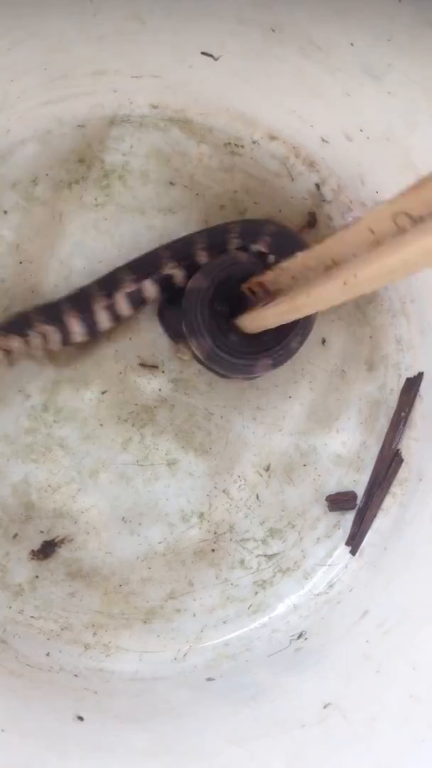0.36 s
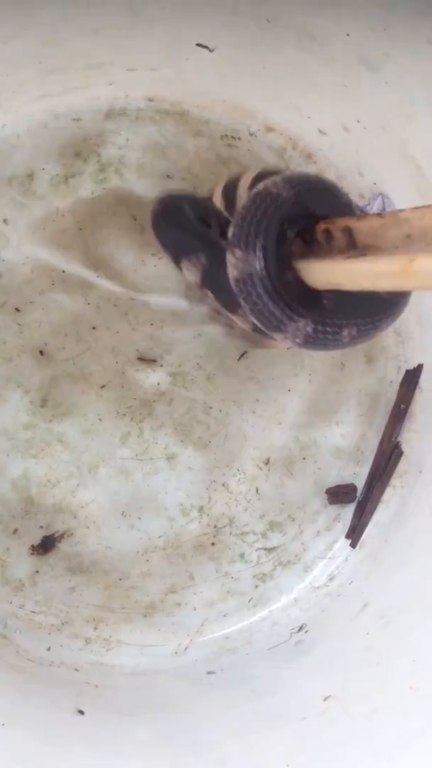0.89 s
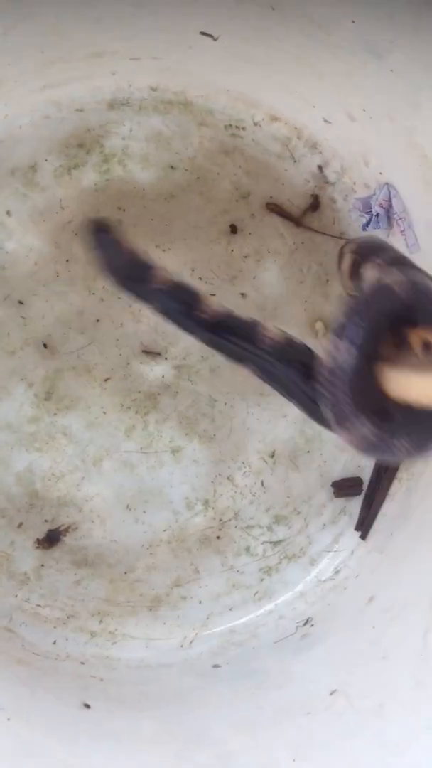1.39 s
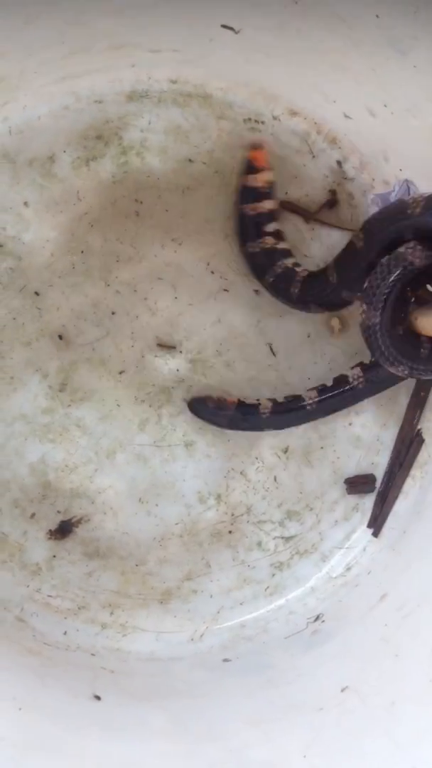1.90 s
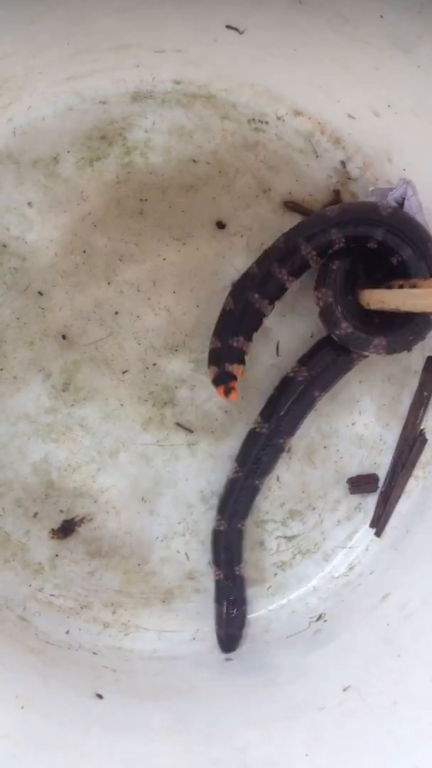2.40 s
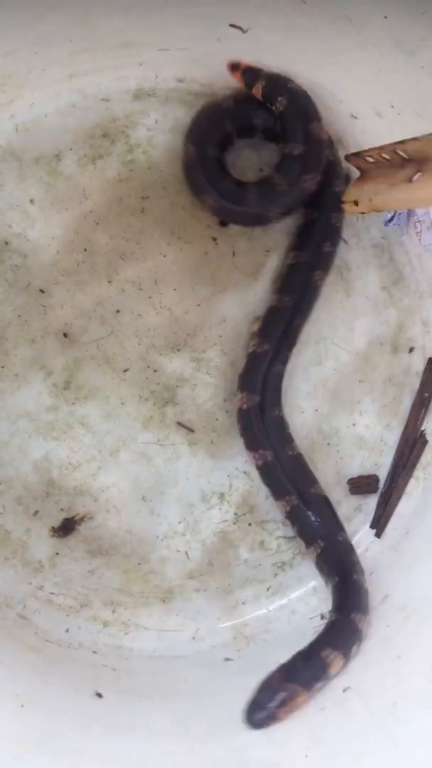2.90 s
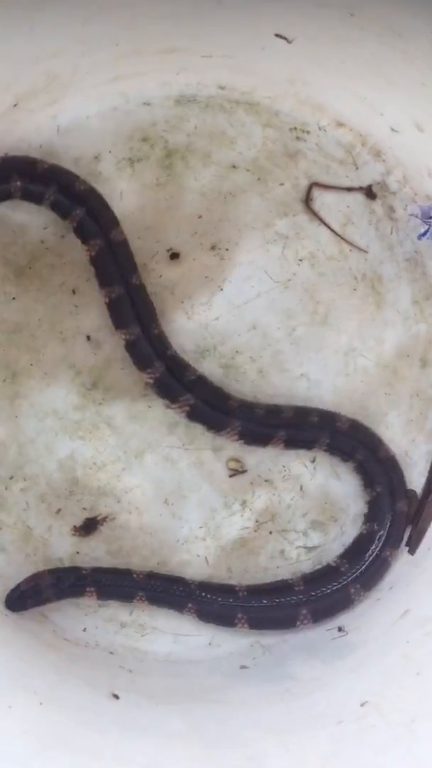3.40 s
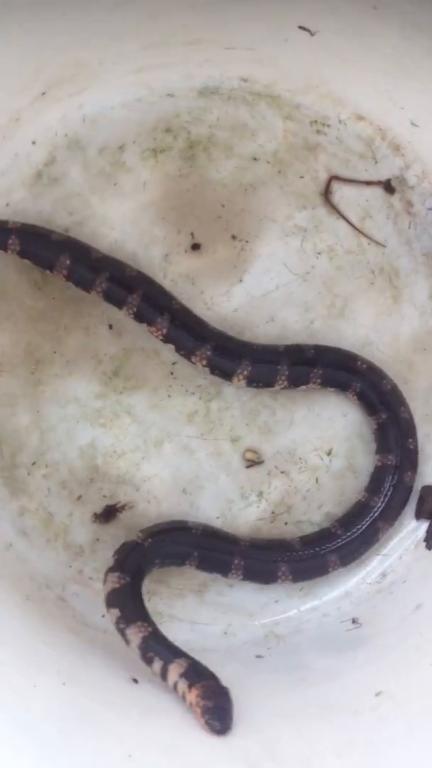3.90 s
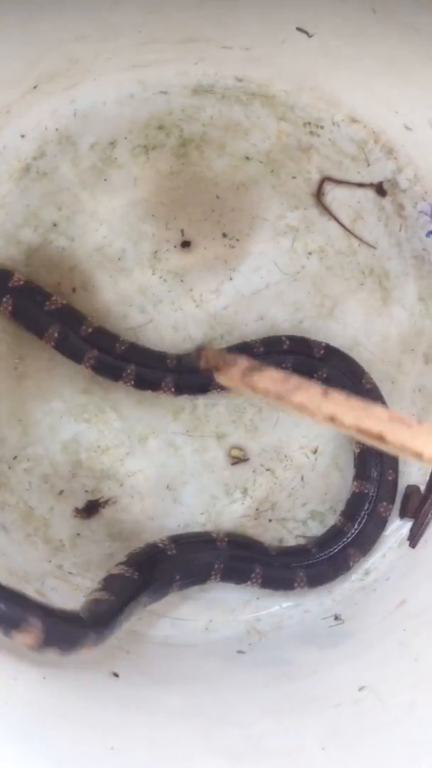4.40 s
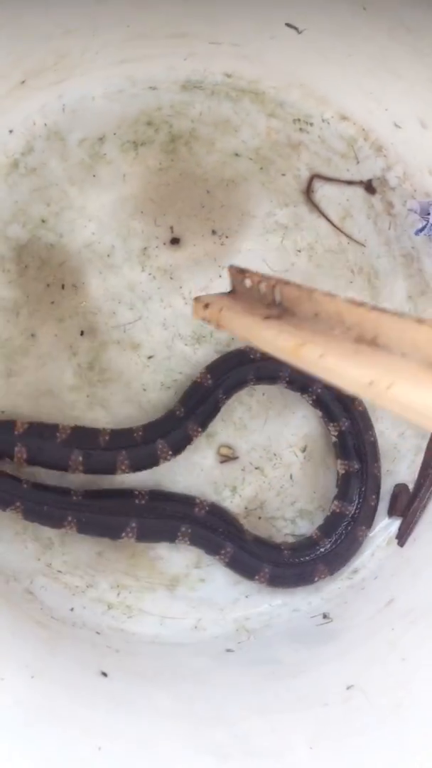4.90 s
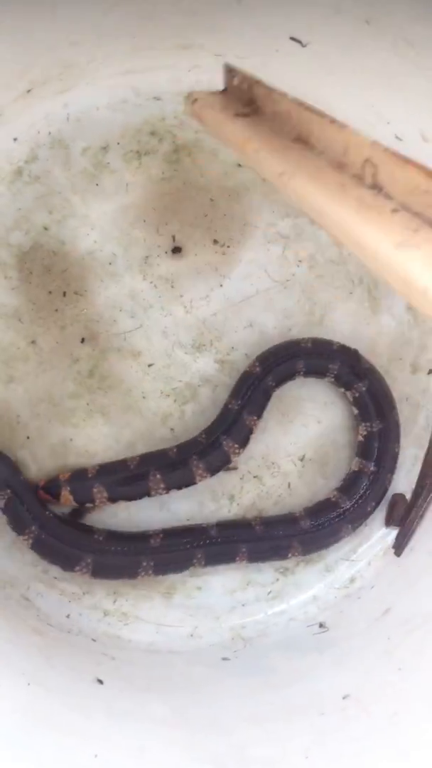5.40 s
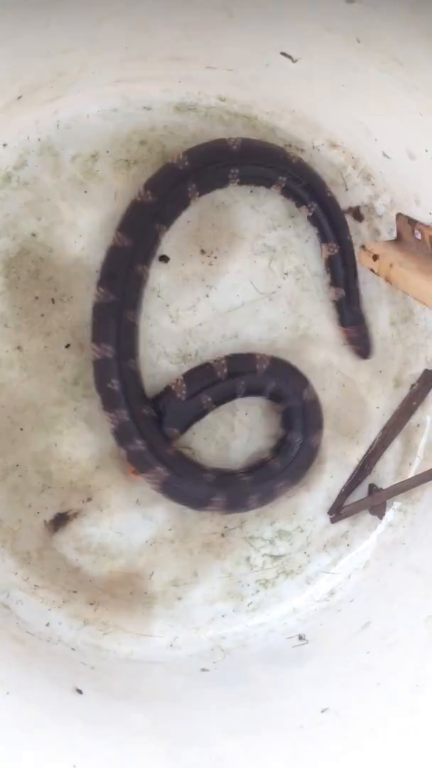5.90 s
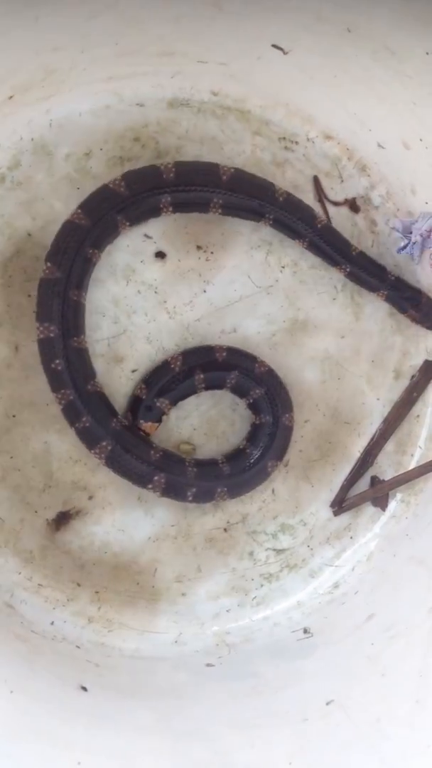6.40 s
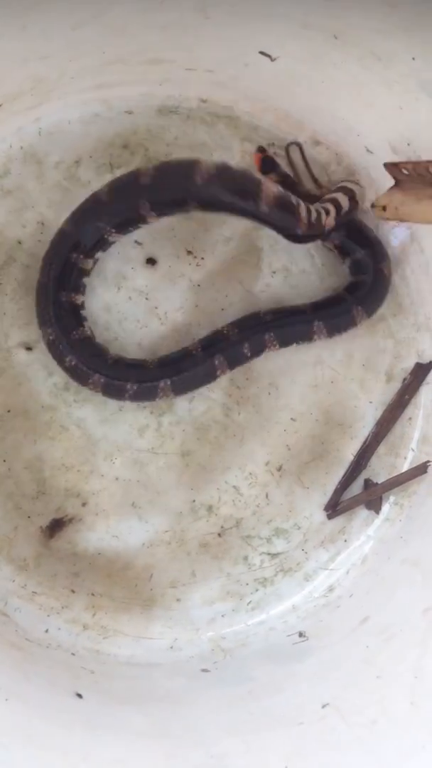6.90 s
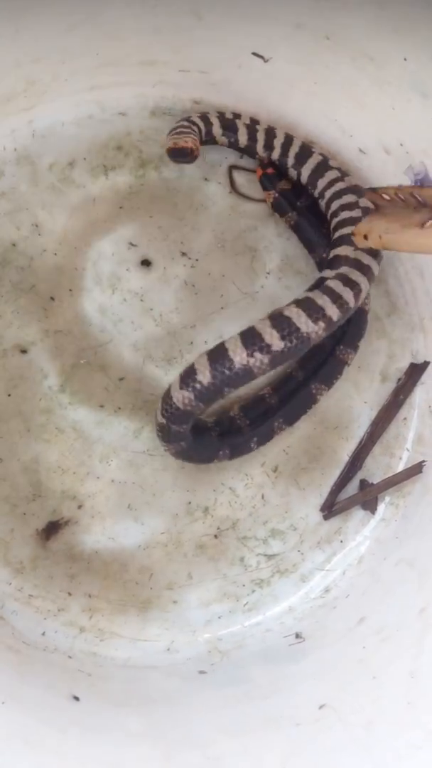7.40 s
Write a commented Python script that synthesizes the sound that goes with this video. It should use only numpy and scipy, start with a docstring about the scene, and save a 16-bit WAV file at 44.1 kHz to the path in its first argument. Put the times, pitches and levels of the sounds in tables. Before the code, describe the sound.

A bamboo stick knocks, taps and skids inside a plastic basin, its bottom thumping hollowly between quiet rumbling gaps with faint chirps.

```python
"""Outdoors, in a plastic basin, a split bamboo stick prods a small snake around the bottom.
The bottom booms like a slack drum: decaying sine modes swell at each landing of stick or body.
The stick tip ticks in filtered noise bursts and skids in dense clicks; scales rustle in uneven catches.
Walls and bamboo ring as resonators over noise-made rumble, murmur and hiss.
Thin far tones, narrow bands of noise, come and go."""
import sys
import numpy as np
from scipy import signal
from scipy.fft import rfft, irfft, next_fast_len
from scipy.io import wavfile

SR = 44100
rng = np.random.default_rng(int(sys.argv[2]) if len(sys.argv) > 2 else 0)


def wav_out(sig):
    """Save sig, one row per channel (or a flat mono array), as 16-bit PCM at SR to the path in sys.argv[1]."""
    wavfile.write(sys.argv[1], SR, np.round(np.clip(np.atleast_2d(sig).T, -1, 1) * 32767).astype(np.int16))


def nominal_scale(level):
    """Amplitude ratio for a level in decibels (scalar or array-like)."""
    x = np.asarray(level, float) / 20
    return 10 ** x


N = 332514

# Landings on the bottom, level before the mode gains: [t/s, level/dB, swell/ms]
LANDINGS = [(0.685, -28, 12), (0.713, -16.5, 13.6), (0.741, -15.5, 5.4), (0.768, -14, 16),
            (0.812, -21.5, 21), (1.077, -33.5, 11.5), (1.402, -17.5, 9.7), (1.523, -24.5, 1.7),
            (1.534, -17, 11.5), (1.605, -33.5, 9.6), (1.991, -34, 4.9), (2.264, -35.5, 7.2),
            (2.3978, -5, 4.06), (3.139, -35, 7), (3.394, -29.5, 16), (3.599, -34, 13), (3.634, -30, 19),
            (3.76, -24, 15), (3.776, -25.5, 10), (3.895, -22, 13.8), (4.032, -35.5, 4.6), (4.788, -39, 36),
            (5.6169, -15, 2), (5.7762, -19, 1.5), (6.688, -27, 5), (6.724, -21.5, 10.8),
            (6.757, -24.5, 6.3), (6.912, -34.5, 3.3)]
# Landings after which the tip stays pressed down: [t/s]
HELD_LANDINGS = [1.403, 3.633, 5.776, 6.687, 6.722]
# Modes of the basin bottom: [f/Hz, level/dB]
BOTTOM_MODES = [(212.6, 4), (168, -8.5)]
# The whole basin jolts and pushes air, level before the pulse shape: [t/s, level/dB, length/s]
AIR_JOLTS = [(1.392, -39.5, 0.015), (1.529, -22, 0.015), (1.983, -30.5, 0.011), (5.592, -19, 0.012)]
FREE_T60_S, HELD_T60_S = 0.1, 0.042
DAMPED_T60_PER_GAP = 1.3   # a landing soon followed by another rings only about a gap long
BOTTOM_TAIL_DB, BOTTOM_TAIL_T60_S = -22, 0.32   # weaker, longer after-ring


def thumps():
    """The bottom swells while the weight comes down, then dies; held or crowded landings damp it."""
    out, t = np.zeros(N + SR), np.arange(SR // 2) / SR
    chance = rng.standard_normal((len(LANDINGS), 3))
    gaps = np.diff([row[0] for row in LANDINGS], append=np.inf)
    for (s, db, swell_ms), gap, luck in zip(LANDINGS, gaps, chance):
        t60 = min(FREE_T60_S, DAMPED_T60_PER_GAP * gap)
        if np.isclose(s, HELD_LANDINGS, rtol=0, atol=.006).any():
            t60 = HELD_T60_S
        contact = max(swell_ms, 1) / 1000
        rise = np.sin(np.pi / 2 * np.minimum(t / contact, 1))
        after = np.maximum(t - contact, 0)
        ring = nominal_scale(-60 * after / max(t60, .01))
        tail = nominal_scale(BOTTOM_TAIL_DB - 60 * after / BOTTOM_TAIL_T60_S)
        swell = rise * nominal_scale(db) * (ring + tail)
        for k, (hz, mode_db) in enumerate(BOTTOM_MODES):
            # chance detunes both modes and varies the level of the second
            tone = -np.sin(2 * np.pi * hz * (1 + 0.012 * luck[k]) * t)
            out[round(s * SR):][:len(t)] += nominal_scale(mode_db + 3.0 * k * luck[2]) * swell * tone
    out = band(out, 80, 3000)   # a small open bowl radiates no deep bass
    for s, db, length in AIR_JOLTS:
        turn = np.linspace(0, 2 * np.pi, round(length * SR))   # one push and pull of air
        out[round(s * SR):][:len(turn)] += nominal_scale(db) * np.sin(turn) * np.sin(turn / 2)
    return out[:N]


# Stick tip on plastic, levels before filtering and mixing: [t/s, knock level/dB, knock f/Hz, crack level/dB]
TOUCHES = [(0.204, -20, 2900, -32.5), (0.368, -53, 2060, -35.5), (0.468, -60, 2500, -40.5),
           (0.6, -20.5, 1650, -56), (0.683, -12.5, 2800, -50), (0.708, -34, 2500, -5),
           (0.712, -6, 2710, -3.5), (0.742, -12, 2070, -16), (0.758, -34, 3452, -8), (0.767, -3, 1600, -13),
           (0.783, 4.5, 1713, -11.5), (0.804, -16.5, 1688, -19.5), (0.818, -19, 4030, -18),
           (1.077, -48.5, 1633, -56), (1.113, -46, 4120, -51), (1.329, -32, 1574, -50),
           (1.404, -19.5, 1047, -23.5), (1.524, -14.5, 1900, -31.5), (1.537, -11, 890, -55),
           (1.556, -18, 1900, -12.5), (1.608, -28, 1080, -37.5), (1.711, -40.5, 1510, -50),
           (1.986, -36.5, 1606, -42.5), (2.386, -25, 2800, -41.5), (2.398, -3.5, 1350, -30),
           (2.404, -12, 2300, -13), (2.442, -27.5, 1400, -24.5), (2.972, -42.5, 2230, -49),
           (3.132, -34, 1470, -56.5), (3.14, -24.5, 1010, -62), (3.372, -30, 1520, -44),
           (3.381, -20.5, 790, -41.5), (3.407, -20.5, 800, -29), (3.476, -35, 960, -59),
           (3.591, -25.5, 1490, -35), (3.629, -33, 1570, -64), (3.761, -21.5, 763, -47),
           (3.807, -33, 2030, -36), (3.893, -21.5, 926, -47), (3.952, -25, 1440, -32),
           (3.966, -20, 1380, -21), (4.046, -32, 2110, -30.5), (4.058, -22, 2070, -26.5),
           (4.416, -42, 1490, -52), (5.583, -22.5, 1062, -36), (5.598, -21.5, 2520, -42),
           (5.6047, 5.5, 1114, -8), (5.613, -7.5, 1050, -30), (5.655, -20.5, 2800, -38.5),
           (5.776, -22, 1198, -48.5), (6.687, -9, 1895, -32), (6.691, -20, 3000, -36),
           (6.72, -13, 927, -32), (6.912, -30.5, 960, -26.5)]
CHATTER_RISE_S, CHATTER_T60_S = .002, 0.019   # the rise is a time constant
CHATTER_TAIL_DB, CHATTER_TAIL_T60_S = -20, 0.093   # fine rattle after the touch


def ticks():
    """Each touch is a click and dying chatter: a knock pitched by where it lands, a crack, a bamboo ring."""
    knock, crack, t = np.zeros(N + SR), np.zeros(N + SR), np.arange(SR // 5) / SR
    force = rng.standard_normal((len(TOUCHES), len(t)))
    click = np.arange(len(t)) == SR // 1000   # 1 ms into the touch
    decay = nominal_scale(-60 * t / CHATTER_T60_S) + nominal_scale(CHATTER_TAIL_DB - 60 * t / CHATTER_TAIL_T60_S)
    dying = decay * (1 - np.exp(-t / CHATTER_RISE_S))
    for (s, knock_db, knock_hz, crack_db), burst in zip(TOUCHES, force):
        chatter = dying * burst + nominal_scale(12.5) * click
        pitched = band(chatter, knock_hz / 1.15, knock_hz * 1.15)
        broad = band(band(chatter, knock_hz / 2.9, 2.4 * knock_hz), knock_hz / 2.8, 3.0 * knock_hz)
        knock[round(s * SR):][:len(t)] += nominal_scale(knock_db) * (pitched + nominal_scale(-7) * broad)
        crack[round(s * SR):][:len(t)] += nominal_scale(crack_db) * (dying * burst + nominal_scale(8) * click)
    knock, crack = knock[:N], crack[:N]
    direct = nominal_scale(5.5) * knock + band(crack, 1100, 9200)
    return direct + nominal_scale(-2.65) * walls(knock) + nominal_scale(-10.5) * stick(crack)


# The tip skids on after a touch, level before mixing: [t/s, hold/s, level/dB]
SKIDS_AFTER_TOUCH = [(1.532, 0.035, -42.5), (2.399, 0.0037, -34.5), (2.441, 0.0053, -49.5),
                     (3.478, 0.0049, -56), (3.938, 0.051, -55.5), (4.023, 0.05, -56), (5.606, 0.0048, -30),
                     (5.643, 0.014, -33.5), (6.73, 0.033, -47)]
# Load on the tip through the one long drag: [t/s, level/dB]
DRAG_LOAD = [(0.684, -37), (0.705, -33), (0.73, -26), (0.75, -39), (0.775, -13.5), (0.79, -19.5),
             (0.81, -21), (0.82, -19), (0.85, -24.5), (0.862, -40), (0.9, -56)]
# Relative spectrum of the slips, of tip and scales alike: [f/Hz, level/dB]
SLIP_SPECTRUM = [(500, -21), (1000, -6.5), (2200, -5), (4500, -2.5), (10000, -6), (15000, -14.5),
                 (16000, -38.5)]
SKID_RISE_DB_PER_S, SKID_FALL_DB_PER_S = 1460, 701.5


def skids():
    """The dragged tip slips so densely that its clicks fuse into noise, as loud as the load."""
    t = np.arange(N) / SR
    load = nominal_scale(in_time(DRAG_LOAD, -150)[0])
    for s, hold, db in SKIDS_AFTER_TOUCH:
        rise_db = SKID_RISE_DB_PER_S * np.maximum(s - t, 0)
        fall_db = SKID_FALL_DB_PER_S * np.maximum(t - s - hold, 0)
        load = load + nominal_scale(db - rise_db - fall_db)
    return coloured(grains(9000, spread_db=-0.5), SLIP_SPECTRUM) * load * nominal_scale(1.5 * drift(180))


# The scales slide, swelling and fading, level before filtering and catches: [t/s, length/s, level/dB]
SCALE_SLIDES = [(0.356, 0.097, -46.5), (0.557, 0.086, -57), (2.132, 0.091, -52.5), (2.332, 0.097, -55.5),
                (3.537, 0.34, -63), (4.233, 0.1, -61), (6.857, 0.17, -59.5)]
SLIDE_ROUNDNESS = 0.59   # exponent of the half-sine swell
CATCHES_PER_S = 90   # central rate; it drifts


def rustles():
    """Light sliding of scales catches and lets go; each catch is sudden and dies away."""
    t = np.arange(N) / SR
    swell = 0
    for s, length, db in SCALE_SLIDES:
        arch = np.abs(np.sin(np.pi * np.clip((t - s) / length, 0, 1))) ** SLIDE_ROUNDNESS
        swell = swell + nominal_scale(db) * arch * (t < s + length)
    turns = np.cumsum(CATCHES_PER_S * nominal_scale(3 * drift(15))) / SR
    catches = nominal_scale(4 - 20 * (turns % 1) + 3 * drift(30))
    slips = band(coloured(grains(3400, spread_db=2.5), SLIP_SPECTRUM), 3100, 8900)
    return nominal_scale(3) * slips * swell * catches


def sliding():
    """Slips of tip and scales are heard directly and through the ringing walls and stick."""
    slips = skids() + rustles()
    return nominal_scale(-0.5) * slips + nominal_scale(-5.0) * walls(slips) + nominal_scale(-13.5) * stick(slips)


# Modes of the split stick: [f/Hz, level/dB]
STICK_MODES = [(1660, 2.5), (2270, 0.5), (2880, 1.5), (3470, 1.5), (3990, 0), (4260, -7), (4660, -5.5),
               (5400, -3), (5920, -5), (6700, -9), (7780, -14), (9890, -12.5)]


def stick(force):
    """The split bamboo rings in many short modes, all with one decay."""
    t60_s = .02
    return resonate(force, [(hz, db, t60_s) for hz, db in STICK_MODES])


# Modes of wall and rim: [f/Hz, level/dB, t60/s]
WALL_MODES = [(788, -7, .1), (972, -6, .045), (1290, -9, .025), (1450, -10, .02), (2130, -7, .02),
              (2440, -7, .02)]


def walls(force):
    """Wall and rim ring in a few modes, the lowest longest."""
    return resonate(force, WALL_MODES)


def resonate(force, modes):
    """A force rings two-pole modes; before the sway, white noise gives equal power at 0 dB."""
    sway_db = 3   # each mode's strength wanders by chance
    out = 0
    for hz, db, t60 in modes:
        r, w = nominal_scale(-60 / (t60 * SR)), 2 * np.pi * hz / SR
        gain = nominal_scale(db) * np.sqrt(1 - r * r) / 2
        drive = force * nominal_scale(sway_db * drift(25.0)) + 1e-18
        out = out + signal.lfilter([gain, 0, -gain], [1, -2 * r * np.cos(w), r * r], drive)
    return out


# Background levels before drift: [t/s, rumble level/dB, hiss level/dB]
BACKGROUND_LEVELS = [(0, -52.5, -57), (0.6, -52, -54.5), (1.25, -55.5, -66.5), (2.1, -52, -58.5),
                     (2.85, -52.5, -62.5), (3.65, -46, -58), (4.15, -50.5, -63.5), (4.5, -51.5, -59),
                     (5.3, -49.5, -64.5), (5.55, -45, -64), (5.85, -57, -71), (6.6, -57, -68.5),
                     (6.85, -50.5, -62), (7.2, -51.5, -63.5), (7.53, -53, -69.5)]
# Relative spectra of rumble, murmur and hiss: [f/Hz, level/dB]
RUMBLE_SPECTRUM = [(20, -58), (35, -34), (65, -0.5), (110, 2), (158, 7), (205, 11.5), (270, -12),
                   (350, -31.5)]
MURMUR_SPECTRUM = [(250, 7.5), (450, 6.5), (600, 6), (710, -6), (960, 5.5), (1500, -6.5), (3000, -14.5),
                   (5000, -23.5)]
HISS_SPECTRUM = [(1500, -2), (3300, -2), (8000, -8.5), (14500, -16), (16000, -11)]
MURMUR_MEAN_DB, MURMUR_FOLLOWS_RUMBLE = -61.5, 0.93   # mean before drift; dB per dB


def around():
    """Rumble picked up by the bowl, a mid murmur tinted by the walls, a fine speckled hiss."""
    rumble_db, hiss_db = in_time(BACKGROUND_LEVELS)
    murmur_db = MURMUR_MEAN_DB + MURMUR_FOLLOWS_RUMBLE * (rumble_db - rumble_db.mean())
    rumble = coloured(rng.standard_normal(N), RUMBLE_SPECTRUM) * nominal_scale(rumble_db + 2.0 * drift(9.8))
    murmur = coloured(rng.standard_normal(N), MURMUR_SPECTRUM) * nominal_scale(murmur_db + 0.89 * drift(3.1))
    specks = grains(150 * nominal_scale(6 * drift(5)), spread_db=4.0)   # random specks make the hiss uneven
    speckled = rng.standard_normal(N) + nominal_scale(8) * specks
    hiss = coloured(speckled, HISS_SPECTRUM) * nominal_scale(hiss_db + 1.8 * drift(20))
    return rumble + murmur + nominal_scale(-29.5) * walls(murmur) + hiss


# A far drone and whine, level before the swell: [t/s, length/s, f/Hz, level/dB]
FAR_HUMS = [(2.7, .25, 560, -67), (4.5, 1.15, 608, -64), (6.2, .48, 580, -64), (4.7, .9, 158, -46),
            (5.95, .35, 157, -54)]
# Hoarse far chirps, level before the swell: [t/s, length/s, f/Hz, level/dB]
FAR_CHIRPS = [(.07, .1, 2650, -66), (.12, .07, 2950, -64), (1.18, .13, 2950, -69), (1.23, .1, 3350, -68),
              (1.45, .08, 2950, -63), (1.48, .05, 3350, -63), (3.05, .08, 3300, -66),
              (4.48, .14, 3320, -60), (4.7, .1, 2660, -66), (6.03, .13, 3370, -68), (6.21, .16, 3345, -69)]


def far_tones():
    """Noise in a narrow band wavers like a thin tone: a low drone, a whine and hoarse high chirps."""
    out = np.zeros(N)
    for rows, half_width_hz in ((FAR_HUMS, 6), (FAR_CHIRPS, 60)):
        for start, length, hz, db in rows:
            first, size = round(start * SR), round(length * SR)
            noise = rng.standard_normal(size + SR // 2)   # extra half second lets the filter settle
            tone = band(noise, hz - half_width_hz, hz + half_width_hz)[-size:]
            swell = np.sin(np.linspace(0, np.pi, size)) ** .4
            out[first:first + size] += swell * nominal_scale(db) * rms_one(tone)
    return out


def rms_one(x):
    """Scale to rms 1."""
    return x / np.sqrt(np.mean(x ** 2) + 1e-20)


def in_time(rows, outside=None):
    """Columns of a curve table, one value a sample."""
    s, *columns = np.transpose(rows)
    return [np.interp(np.arange(N) / SR, s, c, outside, outside) for c in columns]


def drift(rate):
    """Slow chance of spread about 1: noise through two equal poles at rate Hz, one value per 40 samples."""
    r = np.exp(-80 * np.pi * rate / SR)
    noise = rng.standard_normal(N // 40 + 2002)
    slow = signal.lfilter([1], [1, -2 * r, r * r], noise)[2000:]
    return np.interp(np.arange(N) / 40, np.arange(len(slow)), rms_one(slow))


def coloured(x, spectrum):
    """Give a dense noise a spectrum; rms 1."""
    hz, db = np.transpose(spectrum)
    size = next_fast_len(N)
    bins_hz = np.arange(size // 2 + 1) * SR / size
    gain = nominal_scale(np.interp(np.log(bins_hz + 1), np.log(hz), db))
    return rms_one(irfft(rfft(x, size) * gain, size)[:N])


def band(x, low_hz, high_hz):
    """Causal band-pass."""
    sos = signal.butter(2, [low_hz, min(high_hz, .45 * SR)], "band", fs=SR, output="sos")
    return signal.sosfilt(sos, x + 1e-18)


def grains(per_s, spread_db):
    """Random clicks of uneven size and either sign."""
    sizes = nominal_scale(spread_db * np.minimum(rng.exponential(1, N), 5)) * rng.choice([-1, 1], N)
    return sizes * (rng.random(N) < per_s / SR)


def scene():
    """Everything in one channel."""
    return (thumps() + ticks() + sliding() + around() + far_tones())[None]


def low_pass(x):
    """Removes everything above the highest recorded frequency."""
    return signal.sosfilt(signal.butter(12, 16120, fs=SR, output="sos"), x)


def record(dry):
    """The loudest peaks are flattened just under full scale, then the top is cut."""
    flattened = np.clip(dry, -.87, .87)
    top_cut = signal.cheby2(12, 70, 16700, fs=SR, output="sos")   # 70 dB down from 16.7 kHz up
    mix = signal.sosfilt(top_cut, flattened)
    return low_pass(mix)


dry = scene()
out = record(dry)
wav_out(out)
```